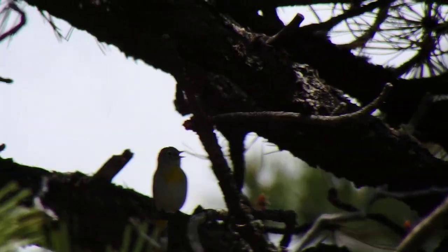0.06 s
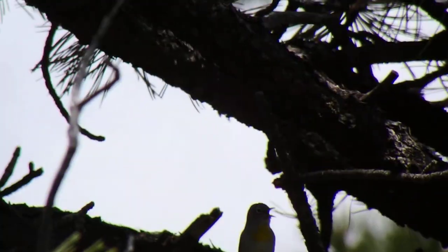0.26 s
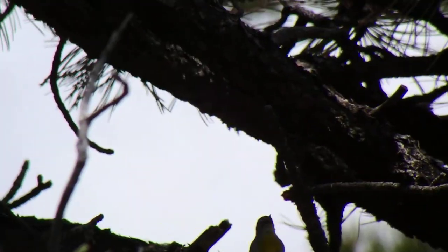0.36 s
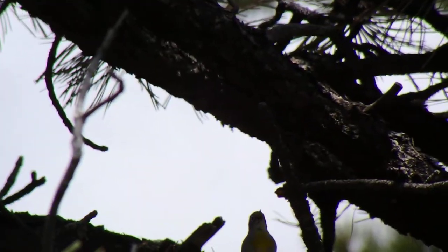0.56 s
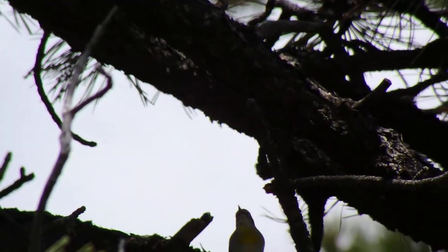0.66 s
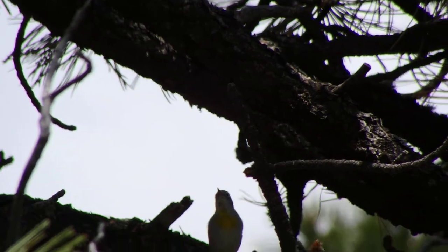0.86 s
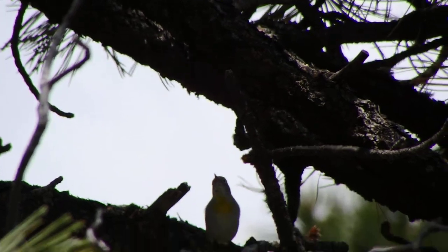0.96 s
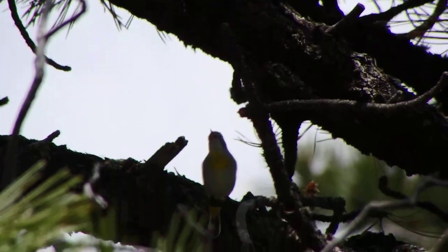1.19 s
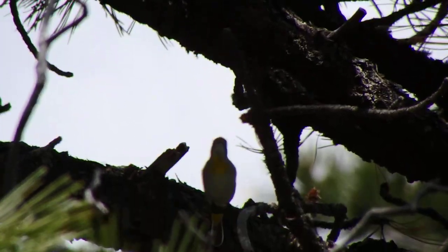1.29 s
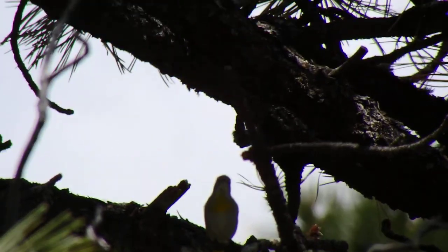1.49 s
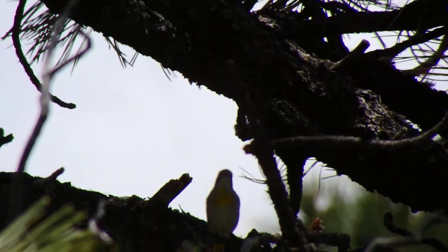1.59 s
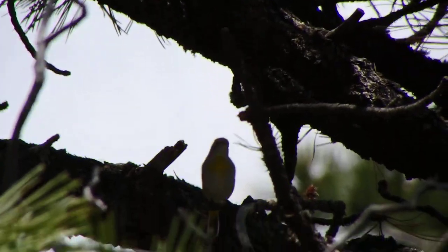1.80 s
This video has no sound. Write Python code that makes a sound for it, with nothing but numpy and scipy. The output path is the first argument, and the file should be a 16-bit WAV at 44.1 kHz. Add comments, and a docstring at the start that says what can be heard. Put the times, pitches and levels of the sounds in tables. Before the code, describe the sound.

A small warbler sings one phrase of six quick, piercing down-and-up slurs that swell, then four wavering two-humped notes that fade, echoing lightly among trees over soft outdoor air and faint low microphone thumps.

```python
"""A warbler sings one run: six V-shaped slurs that swell, then four two-humped warbles that fade.
Each note is one pure gliding whistle, scattered by the branches and trailing off among the trees.
Under it lie a soft rush of filtered noise for the air, low noise swells for buffets on the microphone
and a few short faint bursts of noise, dull or bright, each in one band."""
import sys
import numpy as np
from scipy import signal
from scipy.fft import rfft, irfft
from scipy.io import wavfile
from scipy.ndimage import uniform_filter1d

SR = 44100
rng = np.random.default_rng(int(sys.argv[2]) if len(sys.argv) > 2 else 0)


def bounce(signal):
    """Save signal as a 16-bit WAV file at the path given by the first command-line argument."""
    frames = np.transpose(np.atleast_2d(signal))
    limited = np.clip(frames, -1, 1)
    pcm = np.round(limited * 32767).astype(np.int16)
    wavfile.write(sys.argv[1], SR, pcm)


N = 81585  # length [samples]
TOP_HZ = 15150  # top of the recorder's range


def undb(db):
    """Decibels to gain."""
    return 10 ** (np.asarray(db) / 20)


def unit(x):
    """Scale to rms 1."""
    return x / np.sqrt(np.mean(x ** 2))


def walk(hz):
    """Smooth random wander of rms 1, made of noise that thins out above hz."""
    f = np.arange(N // 2 + 1) * SR / N
    spectrum = rfft(rng.standard_normal(N)) / (1 + (f / hz) ** 4)
    return unit(irfft(spectrum, N))


def band(x, lo_hz, hi_hz):
    """Band-pass filter."""
    return signal.sosfilt(signal.butter(2, [lo_hz, hi_hz], "band", fs=SR, output="sos"), x)


def colour(points):
    """Gain at each frequency from (frequency [Hz], level [dB]) points, joined on a log pitch scale."""
    hz, db = np.array(points).T
    f = np.arange(1, N // 2 + 2) * SR / N  # starts one bin up, to keep the log finite
    return undb(np.interp(np.log(f), np.log(hz), db))


def stereo(mid, side):
    """Left and right from mid and side."""
    return np.array([mid + side, mid - side])


def smooth(x, span_s):
    """Moving average over span_s."""
    return uniform_filter1d(x, max(int(span_s * SR), 1))


def warbler():
    """The song, with quick scatter from the nearby branches and a longer tail from the wood."""
    # note shapes, the V-shaped slur and the warble (held rise, plunge, lower arch), before bends
    # and stretch: (time from note start [s], pitch [Hz], relative level [dB])
    slur_shape = [(0, 6830, -35.5), (.008, 6950, -21.5), (.015, 6390, -11.5), (.021, 5900, -1.5),
                  (.028, 5330, -1.5), (.035, 4820, -3), (.045, 4110, -3), (.051, 3710, -7),
                  (.056, 3670, -16.5), (.062, 3860, -2), (.070, 4350, -2), (.085, 4910, 1),
                  (.096, 5460, -4.5), (.105, 5490, -1), (.112, 5880, -29)]
    warble_shape = [(0, 5020, -27.5), (.012, 5128, -4.5), (.022, 5233, -1.5), (.033, 5393, -2),
                    (.043, 5756, 2.5), (.048, 5798, 2.5), (.054, 5463, -3.5), (.060, 4805, -2.5),
                    (.065, 3930, -4.5), (.073, 3484, -16), (.083, 3656, -12), (.092, 4070, -0.5),
                    (.102, 4496, -3.5), (.109, 4636, -2.5), (.116, 4512, -1.5), (.128, 3953, -7),
                    (.139, 3293, -6), (.145, 3065, -29)]
    # where in the unstretched note the four pitch bends apply: (time [s])
    slur_bends_s = [0, .028, .056, .1]
    warble_bends_s = [0, .047, .075, .14]
    # the sung notes: (start [s], relative level [dB], length factor, swell [dB], extra send to trees [dB],
    # onset bend [Hz], fall or crest bend [Hz], trough bend [Hz], end bend [Hz])
    slur_notes = [(.002, -46, .94, 9.5, 3, 6, -300, 143, 229.5),
                  (0.159, -39.5, .93, 9, 5, 150, -220, 113.5, 204.5),
                  (.308, -33.5, 0.97, 4, 3.5, 30, -100, -63, 3),
                  (.457, -29, 0.95, -0.5, 1, 41, -77, -36, -31.5),
                  (.605, -25.5, 0.99, 3.5, -1.5, 75.5, 45, -10, 44.5),
                  (0.754, -23.5, 0.99, -2, -2, -120, 124.5, 23, -44.5)]
    warble_notes = [(.905, -24, 0.953, 2.5, -2, 300, -87.5, 10.5, -32),
                    (1.087, -25.5, 1.0, 1.5, -1.5, -9, -3.5, 46, -6),
                    (1.279, -29, 1.0, 1, 1, -15.5, 15.5, -51, -4),
                    (1.473, -32.5, 1.014, -0.5, 2, -21.5, 198, -130, 79.5)]
    # the path to the microphone favours some pitches over others: (frequency [Hz], gain [dB])
    path_tone = [(3000, -4), (4550, .5), (4800, 1), (5450, 1.28), (5720, -3), (5930, -9), (6170, 3),
                 (6430, -2.5), (6750, 8.5), (7100, -2)]
    pan_db = 0.3  # left over right
    branch_db, branch_t60_s = -10.5, 0.099
    wood_db, wood_t60_s = -18, 0.45

    voice = whistle(slur_shape, slur_bends_s, slur_notes)
    voice += whistle(warble_shape, warble_bends_s, warble_notes)
    song, sent_to_trees = irfft(rfft(voice) * colour(path_tone), N)
    direct = song * undb(np.array([[pan_db], [-pan_db]]) / 2)
    branches = echoes(sent_to_trees, branch_db, branch_t60_s)
    wood = echoes(sent_to_trees, wood_db, wood_t60_s)
    return direct + branches + wood


def whistle(shape, bends_s, notes):
    """A pure tone glides through the shape at each note; returns the direct voice and the send to the trees."""
    glide_s = 0.0074  # the throat rounds every turn of pitch
    attack_s = 0.003  # rounds every turn of level
    waver_share, flutter_db, waver_hz = 0.003, 2, 226  # small fast wander of pitch and level

    at, pitch, loud = np.array(shape).T
    t, out = np.arange(N) / SR, np.zeros((2, N))
    waver = 1 + waver_share * walk(waver_hz)
    flutter = flutter_db * walk(waver_hz)
    for start, db, length, swell_db, echo_db, *bend_hz in notes:
        age = (t - start) / length  # time within the unstretched shape
        part = np.clip(age / at[-1], 0, 1)  # 0 at the note's start, 1 at its end
        bent_pitch = np.interp(age, at, pitch) + np.interp(age, bends_s, bend_hz)
        hz = smooth(bent_pitch, glide_s) * waver
        level_db = db + np.interp(age, at, loud) + swell_db * (part - .5) + flutter
        size = undb(level_db) * (part > 0) * (part < 1)
        # root 2 gives the sine an rms of 1 before its level
        tone = np.sqrt(2) * smooth(size, attack_s) * np.sin(2 * np.pi * np.cumsum(hz) / SR)
        out += np.array([tone, undb(echo_db) * tone])
    return out


def echoes(x, db, t60_s):
    """Many small reflections that die away, arriving mostly from the front: convolution with fading noise."""
    first_s, width = 0.0036, 0.24  # wait before the first reflection, share of side
    t = np.arange(N) / SR
    fade = np.exp(-np.log(1000) * t / t60_s) * (t > first_s)
    tail = rng.standard_normal((2, N)) * fade
    mid, side = tail / np.sqrt(np.sum(tail[0] ** 2))  # mid of unit energy
    return undb(db) * signal.fftconvolve(stereo(mid, width * side), x[None], axes=1)[:, :N]


def air():
    """A distant rush of shaped noise, its level flickering slightly, with faint hiss on top."""
    # tone of the rush: (frequency [Hz], relative level [dB])
    air_tone = [(20, -1), (100, 0), (200, -3), (380, -4), (600, -9.5), (1200, -14), (2600, -22.5),
                (5000, -24), (8000, -34), (10500, -39.5), (13500, -34), (15300, -44.5)]
    # width of the rush: (frequency [Hz], side minus mid [dB])
    air_width = [(40, -7), (150, -2.5), (400, -6.5), (1500, -4.5), (9000, -3.4)]
    level_db, flicker_db, flicker_hz = -48.5, 0.62, 18

    mid, side = rfft(rng.standard_normal((2, N))) * colour(air_tone)
    mid, side = irfft(mid, N), irfft(side * colour(air_width), N)
    return stereo(mid, side) / np.std(mid) * undb(level_db + flicker_db * walk(flicker_hz))


def buffets():
    """Wind or handling pushes on the microphone: short swells of low band-passed noise."""
    # (time of peak [s], level at peak [dB], half-width where the swell falls to exp(-2) [s], pitch [Hz])
    pushes = [(.008, -44.5, 0.047, 34.8), (0.288, -49.5, 0.14, 48.3), (0.469, -50, 0.035, 54.9),
              (0.957, -42.5, 0.02, 121), (0.984, -48.5, 0.056, 82.3), (1.605, -52, 0.092, 45.5),
              (1.729, -48.5, 0.034, 41.8)]
    t, out = np.arange(N) / SR, np.zeros((2, N))
    for at, db, length, hz in pushes:
        mid = unit(band(rng.standard_normal(N), hz / 1.28, hz * 1.44))
        side = unit(band(rng.standard_normal(N), hz / 1.28, hz * 1.44))
        swell = np.exp(-2 * ((t - at) / length) ** 2)
        out += stereo(mid, 0.97 * side) * undb(db) * swell
    return out


def noise_bursts():
    """Short faint bursts of noise, dull or bright, each in one band and fading fast."""
    # (onset [s], level before the fade [dB], band centre [Hz], band width before limits [Hz])
    bursts = [(.176, -58, 10000, 8000), (.201, -45, 7400, 800), (0.303, -58.5, 10840, 8000),
              (0.676, -58, 10000, 8000), (.913, -56, 10700, 7000), (0.941, -43, 1750, 1095),
              (.958, -43, 1700, 890), (1.022, -53, 10500, 8000), (1.0693, -36, 1605, 500),
              (1.2143, -45.5, 1630, 800), (1.424, -54, 10800, 7000), (1.505, -44, 1480, 850),
              (1.525, -57, 10900, 7000), (1.73, -49, 1680, 1000), (1.806, -58.5, 10500, 8000)]
    t60_s = 0.02
    t, out = np.arange(N) / SR, np.zeros((2, N))
    for at, db, hz, width in bursts:
        lo_hz, hi_hz = max(hz - width / 2, 100), min(hz + width / 2, TOP_HZ)
        mid = unit(band(rng.standard_normal(N), lo_hz, hi_hz))
        side = unit(band(rng.standard_normal(N), lo_hz, hi_hz))
        fade = np.exp(-np.log(1000) * np.abs(t - at) / t60_s) * (t > at)
        soft_fade = uniform_filter1d(fade, size=40)  # samples; softens the onset
        out += undb(db) * stereo(mid, .45 * side) * soft_fade
    return out


def scene():
    """The bird over the air, the low buffets and the short bursts of noise."""
    return warbler() + air() + buffets() + noise_bursts()


def record(dry):
    """The recorder cuts the top with a steep low-pass."""
    return signal.sosfilt(signal.ellip(10, .1, 70, TOP_HZ, fs=SR, output="sos"), dry)


dry = scene()
out = record(dry)
bounce(out)
```